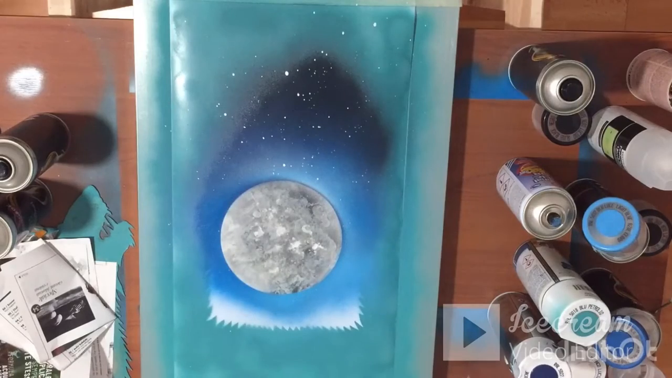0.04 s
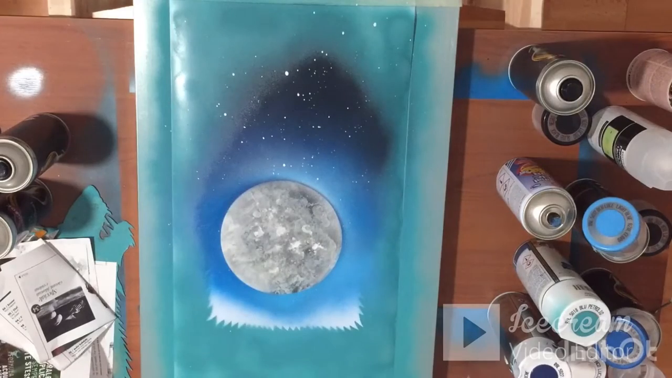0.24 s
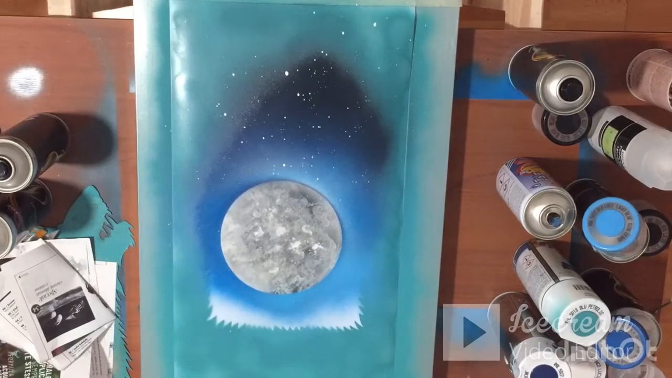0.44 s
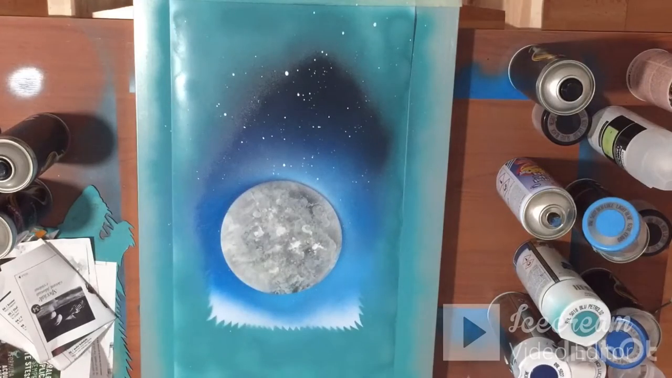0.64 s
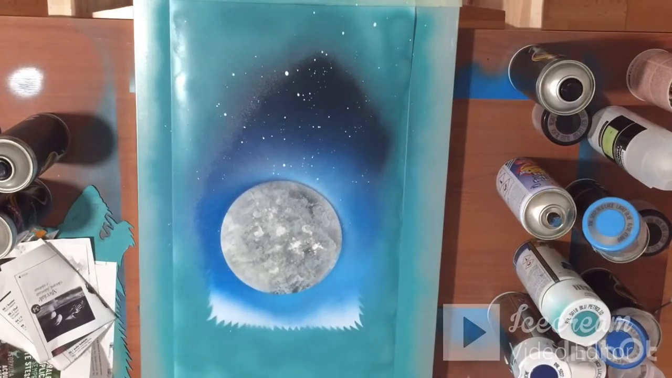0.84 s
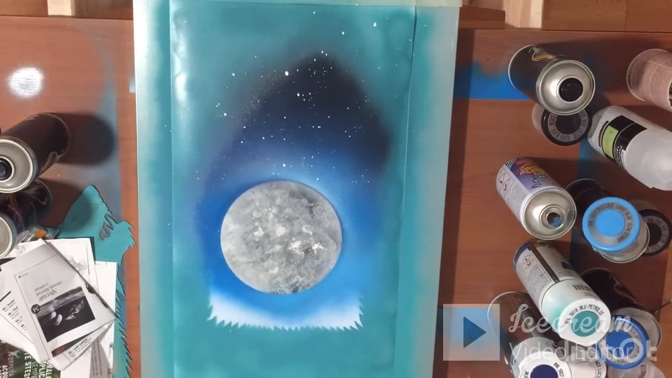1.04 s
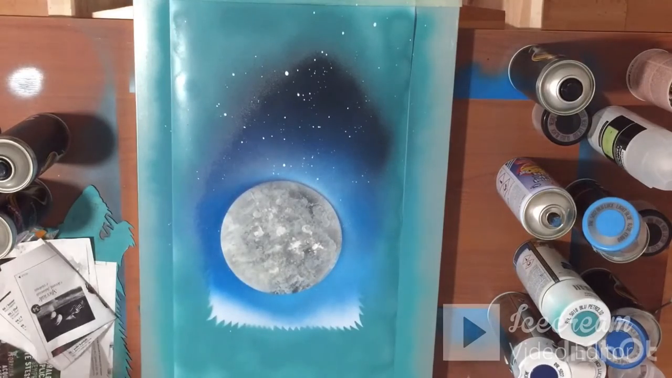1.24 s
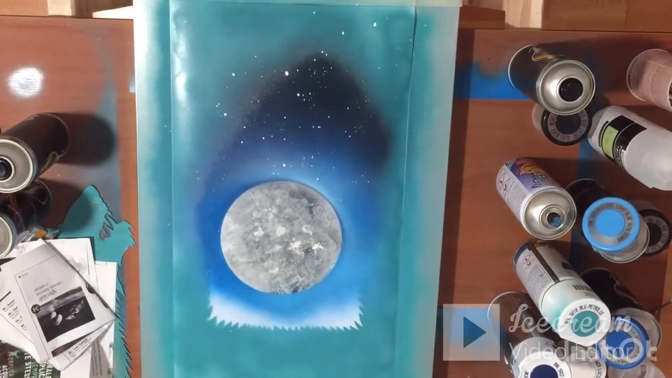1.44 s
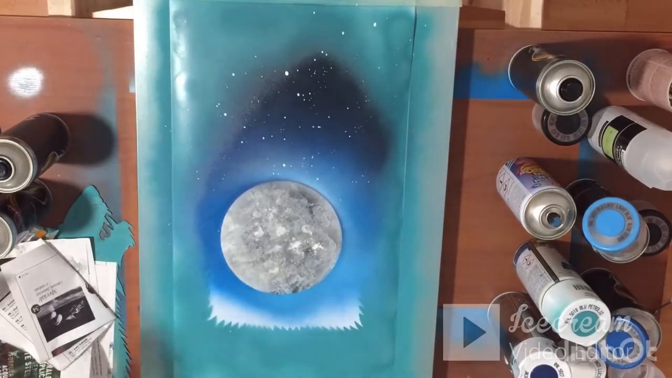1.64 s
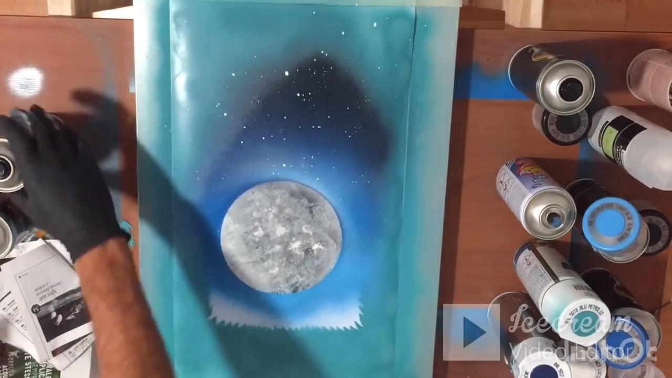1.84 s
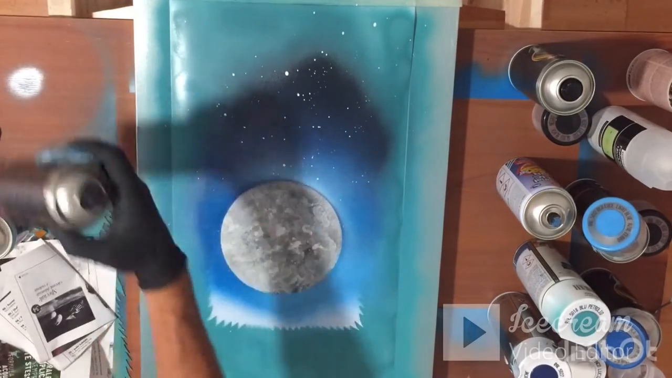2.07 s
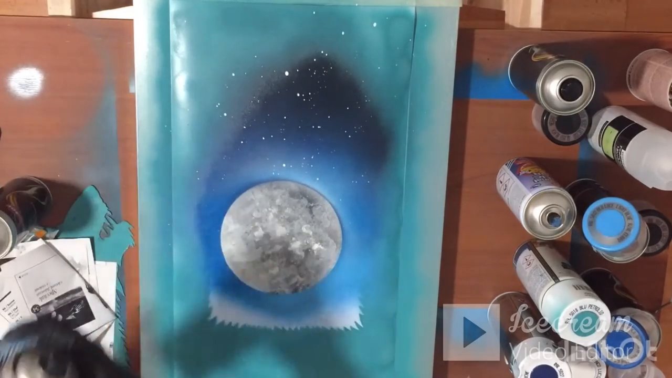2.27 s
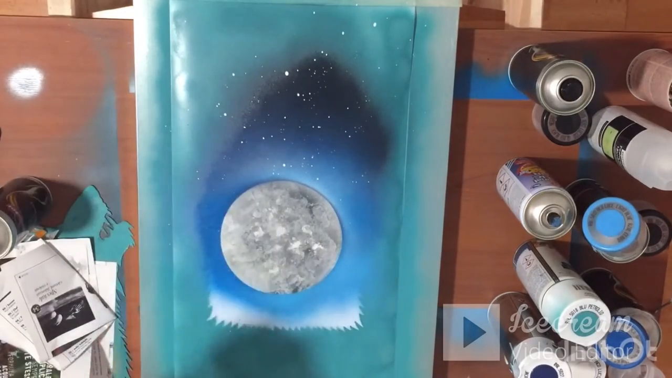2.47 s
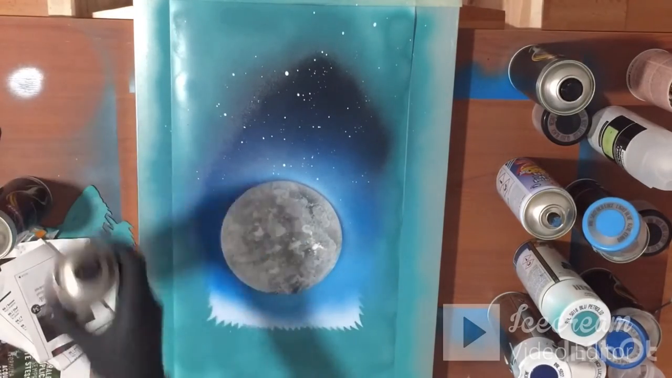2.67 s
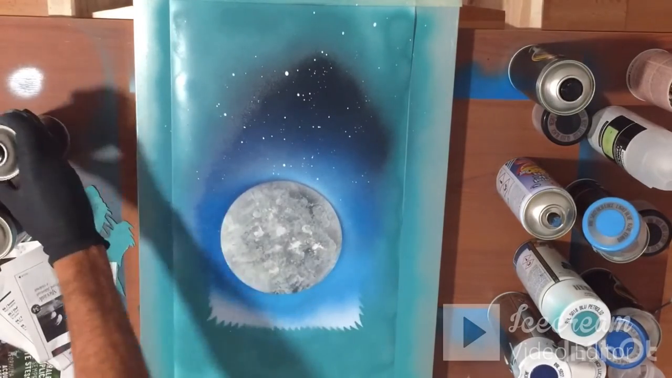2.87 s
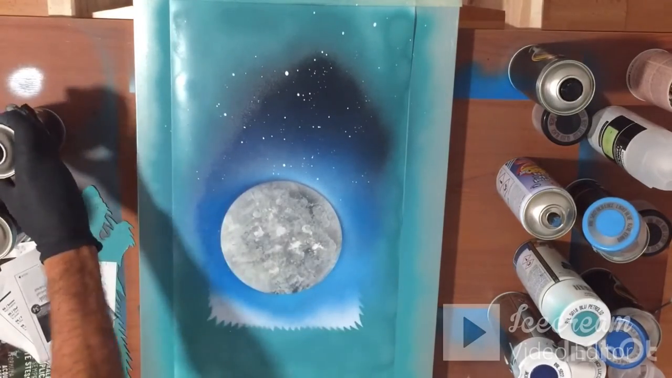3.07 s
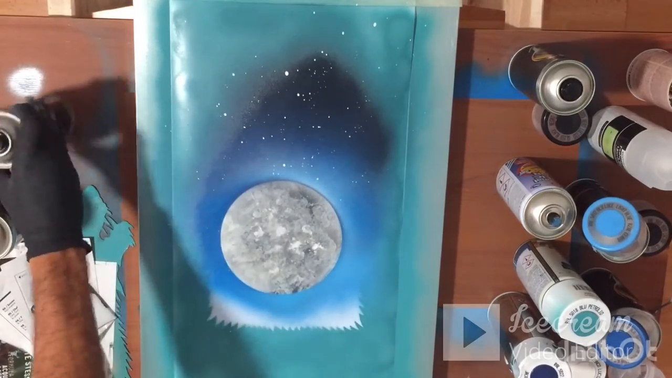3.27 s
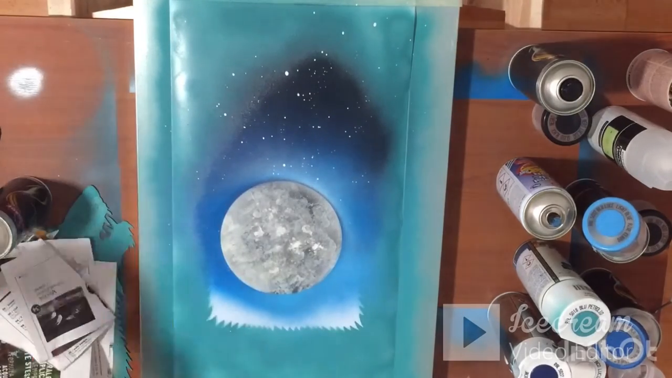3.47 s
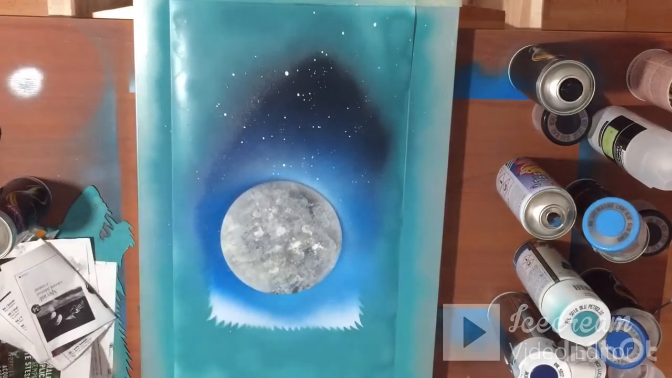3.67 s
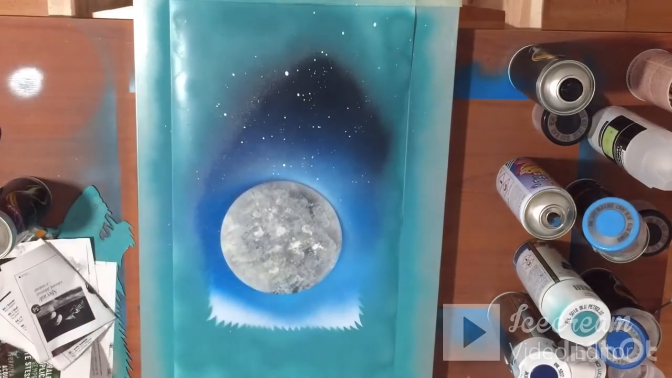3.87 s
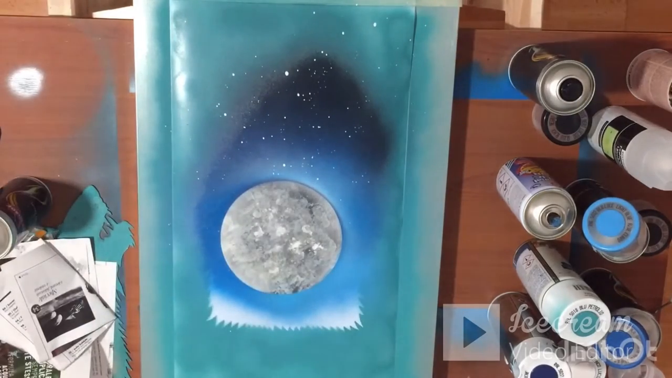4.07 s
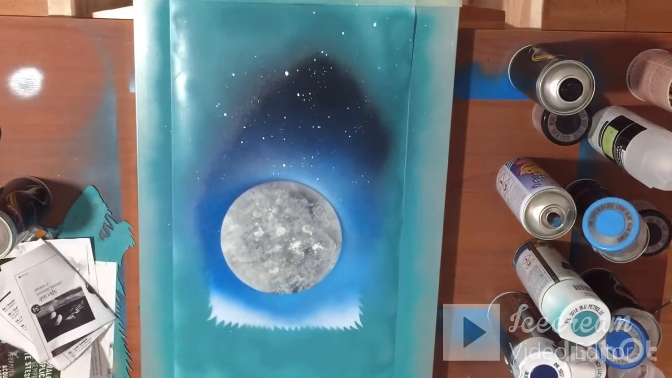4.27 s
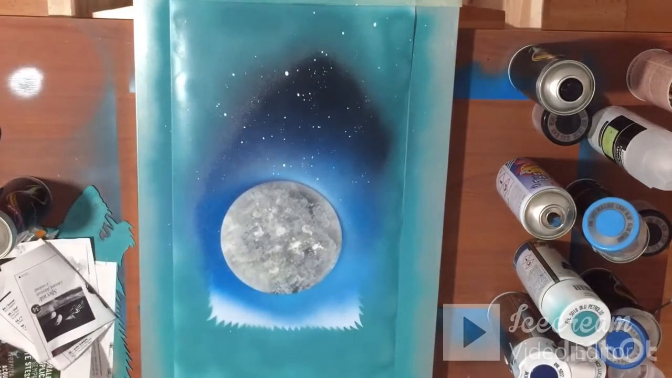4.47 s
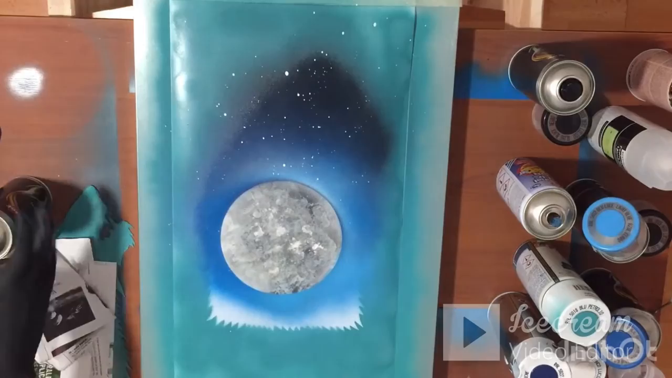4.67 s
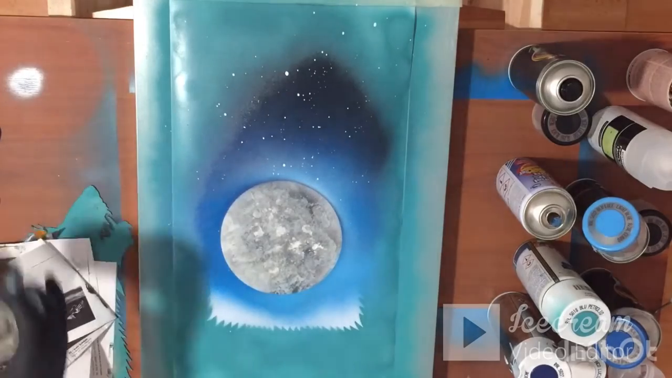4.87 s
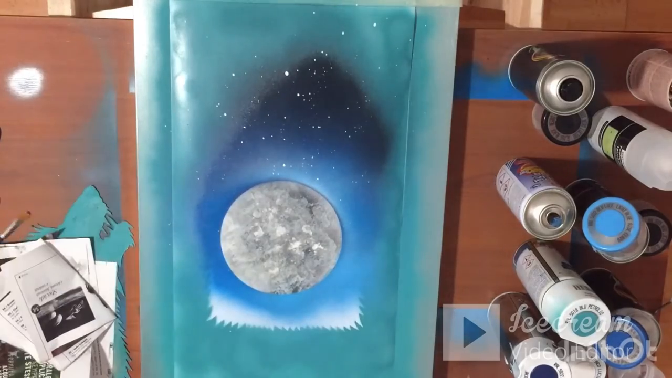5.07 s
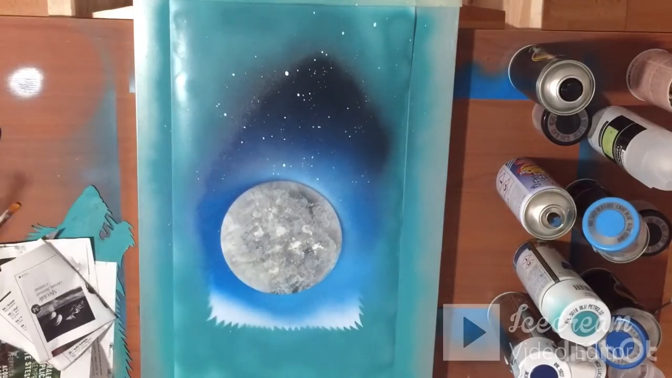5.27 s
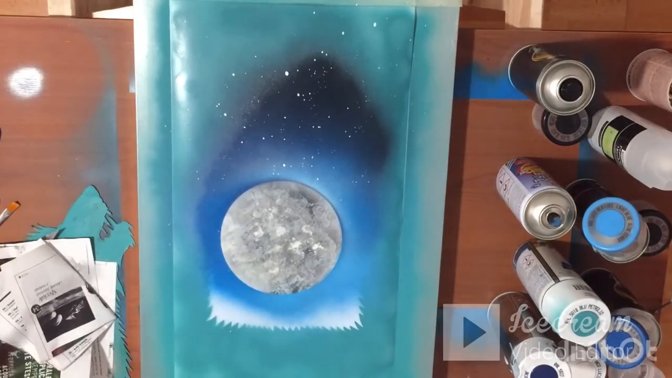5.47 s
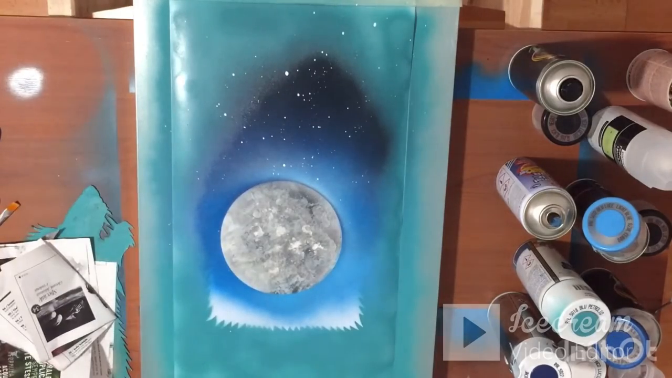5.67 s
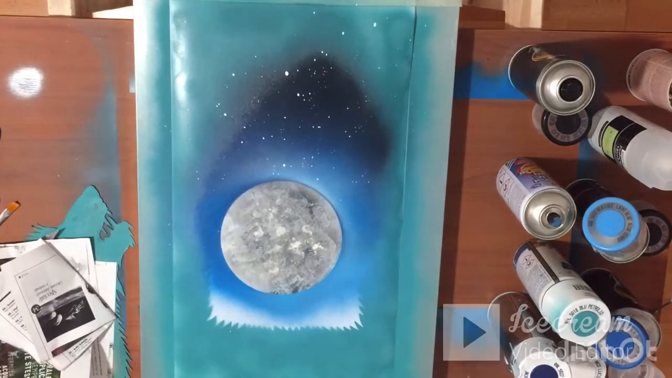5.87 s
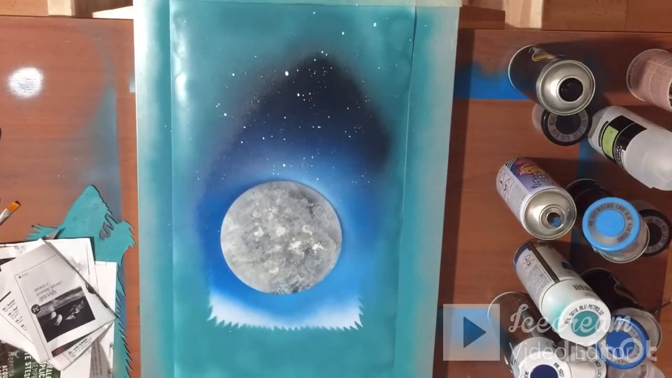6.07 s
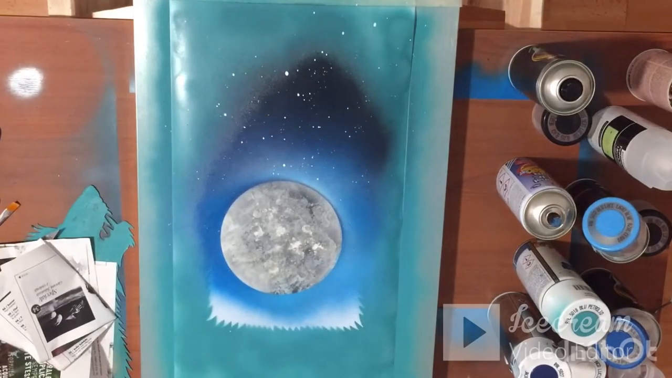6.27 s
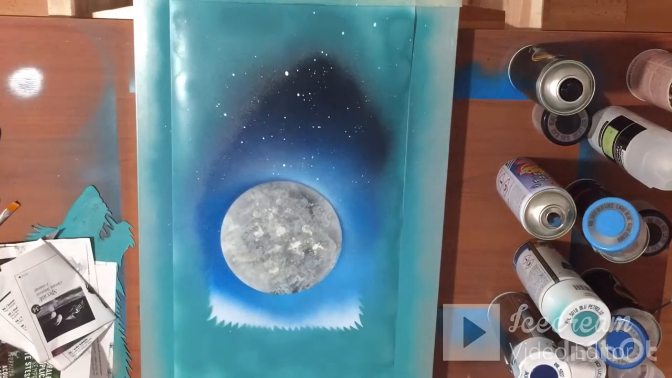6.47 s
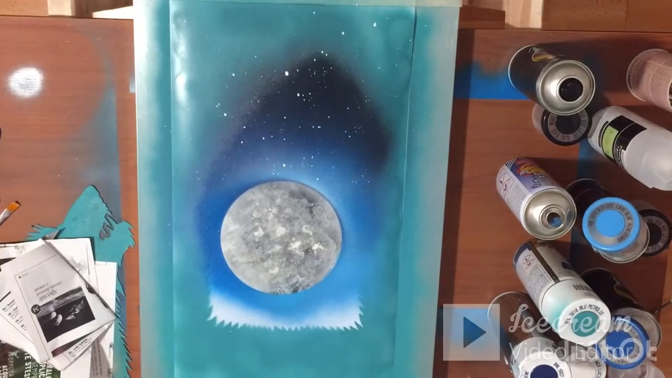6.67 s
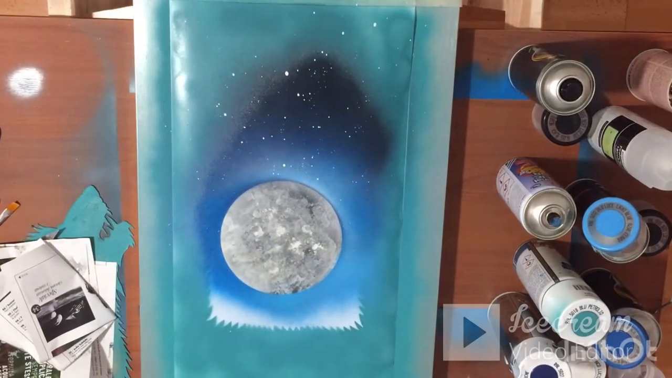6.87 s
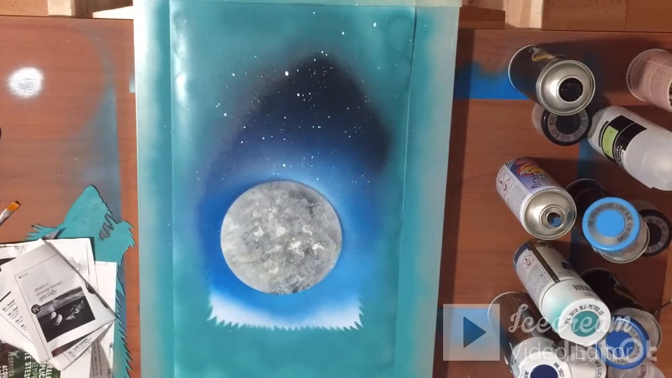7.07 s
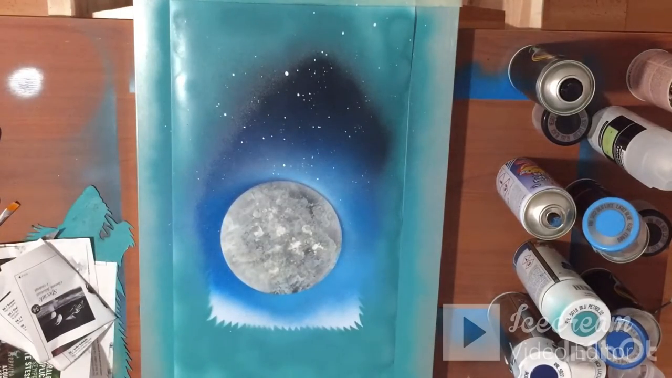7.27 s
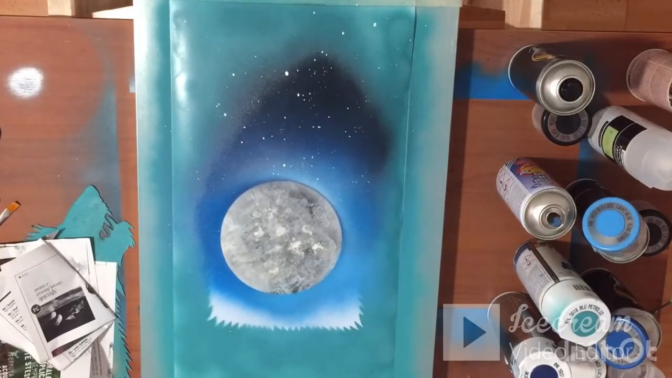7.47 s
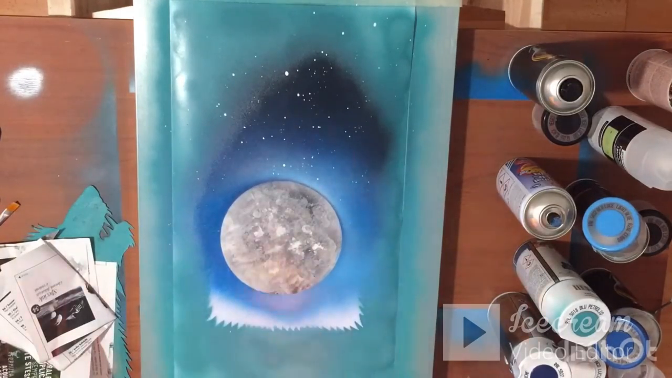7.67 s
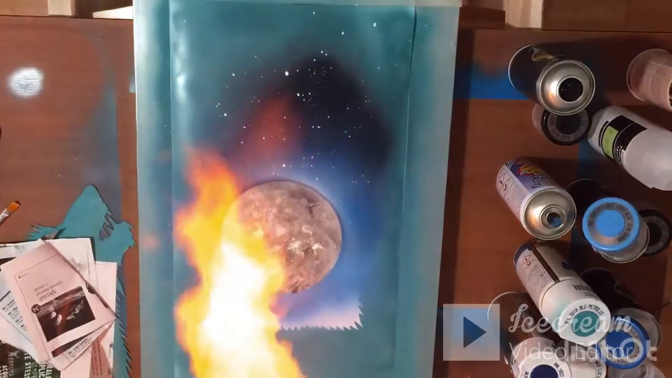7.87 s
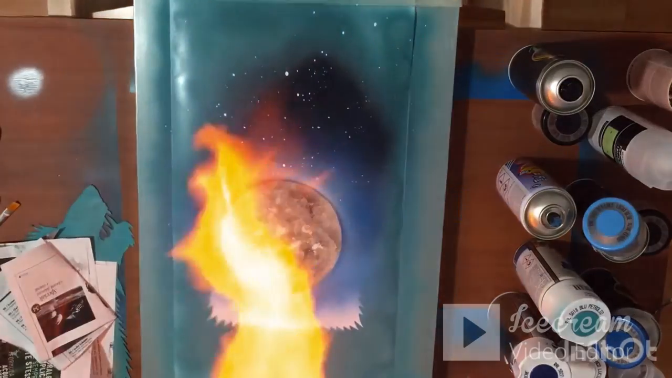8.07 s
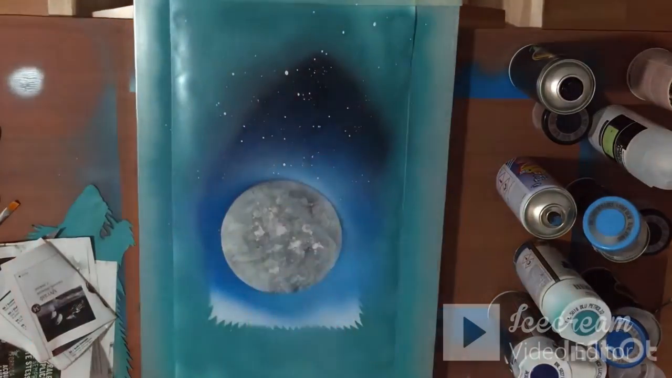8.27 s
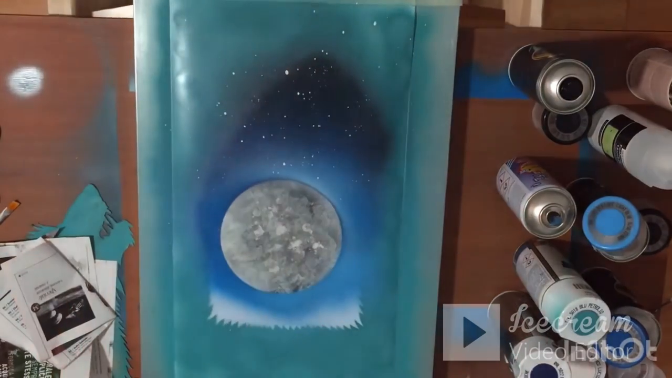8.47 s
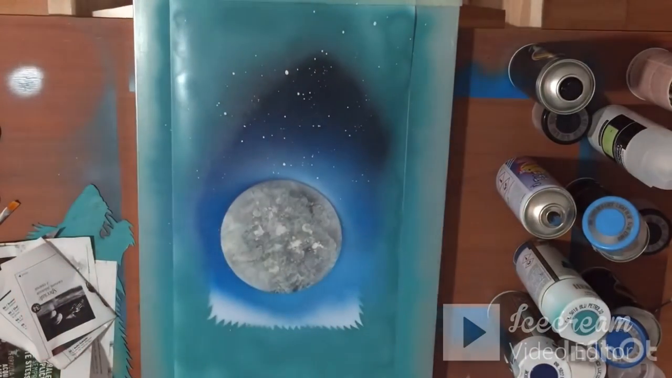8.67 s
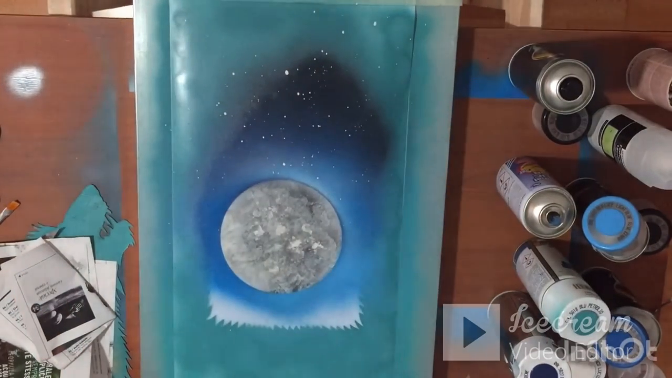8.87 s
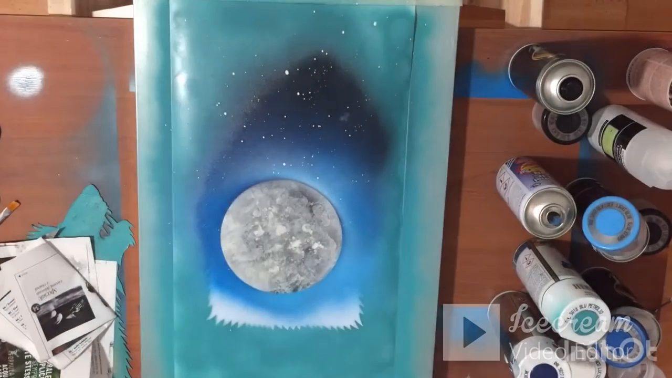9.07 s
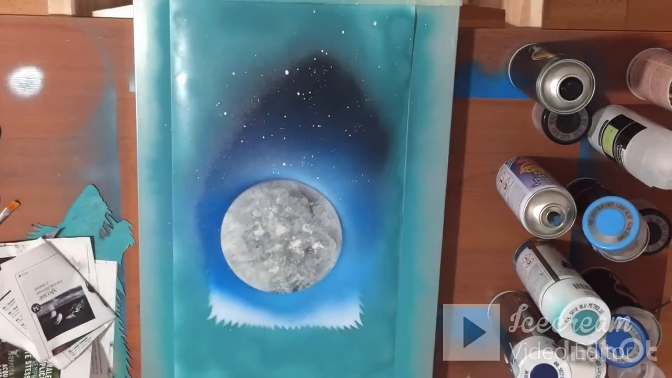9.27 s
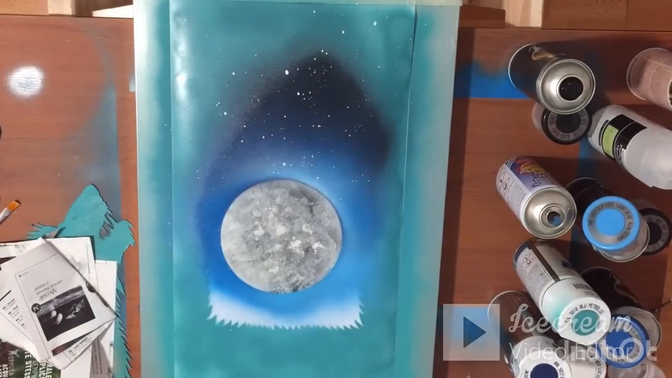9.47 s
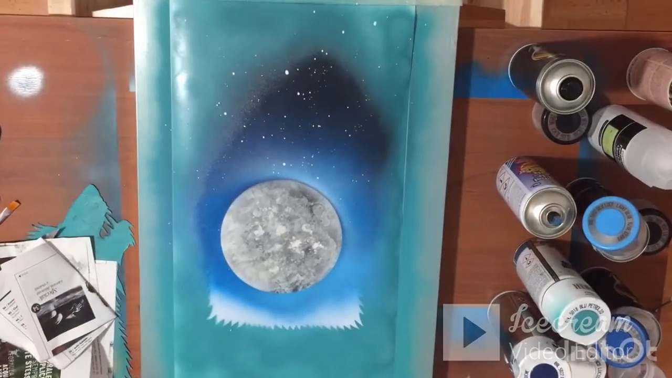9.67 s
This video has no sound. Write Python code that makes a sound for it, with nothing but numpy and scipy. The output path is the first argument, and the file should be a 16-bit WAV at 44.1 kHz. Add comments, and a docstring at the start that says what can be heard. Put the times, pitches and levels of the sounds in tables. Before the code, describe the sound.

Close single-microphone sound from a small room: things are put down on a wooden tabletop with dull, chattering knocks, a glove brushes over cans and paper, and thin metal clinks. Small objects are nudged about, then a paint can rattles rhythmically for over a second. After a pause and two sharp plastic snaps, a spray jet bursts into booming flame, dies quickly, and leaves quiet with low thuds and three lighter clicks.

```python
"""Dull room tone and a glove's strokes come first, at a painter's table in a small room, one microphone.
Things are set down on wood as bursts of micro-impacts, and spray cans clink with dying metal modes.
A can is shaken: its ball clacks on the ends while paint sloshes as many tiny slips. A lighter clicks twice;
the spray, coloured noise, catches fire and roars for under a second. Soft low bumps follow, and the lighter
clicks three more times. Struck and rubbed sounds reach the microphone with decaying reflections."""
import sys
import numpy as np
from scipy import signal
from scipy.fft import rfft, irfft, next_fast_len
from scipy.io import wavfile
from scipy.ndimage import uniform_filter1d

SR = 44100
rng = np.random.default_rng(int(sys.argv[2]) if len(sys.argv) > 2 else 0)


def dump(signal):
    """Clip the signal to [-1, 1] and save it as 16-bit WAV at the path in sys.argv[1]."""
    limited = np.clip(np.atleast_2d(signal).T, -1, 1)
    pcm = np.round(limited * 32767).astype(np.int16)
    wavfile.write(sys.argv[1], SR, pcm)


N = 429534


def amp(db):
    """Amplitude factor of a level in dB."""
    return 10 ** (np.asarray(db) / 20)


def unit_rms(x):
    """Scales to rms 1."""
    return x / np.sqrt(np.mean(x ** 2) + 1e-20)


def unit_energy(x):
    """Scales to a sum of squares of 1."""
    return x / np.sqrt(np.sum(x ** 2) + 1e-20)


def read_curve(points, hz):
    """Reads a curve between its points, along log frequency."""
    f, value = np.transpose(points)
    return np.interp(np.log(hz + 1), np.log(f + 1), value)


def held(on, off, attack_s, fall_db_per_s):
    """Gain over time: rises 60 dB in attack_s to be full at on, holds until off, dies away."""
    t = np.arange(N) / SR
    rise_db = -60 * np.maximum(on - t, 0) / attack_s
    fall_db = -fall_db_per_s * np.maximum(t - off, 0)
    return amp(rise_db + fall_db)


def hump(middle, length):
    """A smooth bell over time, of height 1."""
    return np.exp(-(2 * (np.arange(N) / SR - middle) / length) ** 2)


def add(mix, s, sound):
    """Adds a sound into the mix, starting at s seconds."""
    part = mix[max(round(s * SR), 0):][:len(sound)]
    part += sound[:len(part)]


def coloured_noise(spectrum):
    """Steady noise with the given spectrum, at rms 1."""
    size = next_fast_len(N)
    return shape(rng.standard_normal(N), spectrum, size)


def shape(x, spectrum, size):
    """Gives a long sound a spectrum, at rms 1."""
    gain = amp(read_curve(spectrum, np.fft.rfftfreq(size, 1 / SR)))
    return unit_rms(irfft(rfft(x, size) * gain, size)[:N])


def wobble(hz):
    """Smooth chance of rms 1 that changes hz times a second."""
    return unit_rms(np.interp(np.arange(N) / SR * hz, np.arange(N), rng.standard_normal(N)))


def blow(spectrum, tilt_db, contact, patchy_db=0):
    """A dying burst of micro-impacts through a body's causal colour; energy 1."""
    taps = 4096
    hz, t = np.fft.rfftfreq(taps, 1 / SR), np.arange(2 * taps) / SR
    force = rng.standard_normal(len(t)) * np.exp(-(t / contact) ** 2 / 2)
    # the burst is evened out over frequency, so that the body sets the colour
    force_spectrum = np.sqrt(uniform_filter1d(abs(rfft(force)[::2]) ** 2, size=25))
    # each striking place favours other resonances
    place = unit_rms(uniform_filter1d(rng.standard_normal(len(hz)), size=50))
    # harder contact brightens everything above 1 kHz
    octaves = np.log2(np.maximum(hz, 1000) / 1000)
    gain = amp(read_curve(spectrum, hz) + tilt_db * octaves + patchy_db * place) / force_spectrum
    # minimum phase: the body answers as early as its colour allows
    log_gain = np.log(np.r_[gain, gain[-2:0:-1]])
    body = np.fft.ifft(np.exp(np.conj(signal.hilbert(log_gain)))).real
    return unit_energy(signal.fftconvolve(force, body)[:len(t)])


def ring(modes, detune):
    """Dying modes, started from rest; pitch and strength depend on grip and striking place; energy 1."""
    t = np.arange(SR // 2) / SR
    grip = 1 + detune * rng.uniform(-1.3, 1)
    strengths = rng.choice([-1, 1], len(modes)) * amp(2 * rng.standard_normal(len(modes)))
    total = np.zeros(len(t))
    for strength, (hz, db, t60) in zip(strengths, modes):
        total += strength * amp(db - 60 * t / t60) * np.sin(2 * np.pi * hz * grip * t)
    return unit_energy(total)


# the small room's decay: f/Hz, time to fall 60 dB/s
ROOM_DECAY = [(150, 0.46), (500, 0.31), (1500, 0.38), (4000, 0.33), (8000, 0.28), (16000, 0.21)]


def room_tail():
    """Dense reflections, each band dying at its own speed; energy 1."""
    size = SR // 2
    fade_in = np.clip(np.arange(size) / SR / 0.002 - .5, 0, 1)  # silent for 1 ms, full at 3 ms
    reflections = rng.standard_normal(size) * (rng.random(size) < .15) * fade_in
    hz, t, bands = signal.stft(reflections, SR, nperseg=256)
    decay = amp(-60 * t / read_curve(ROOM_DECAY, hz)[:, None])
    return unit_energy(signal.istft(bands * decay, SR, nperseg=256)[1])


def in_room(x, wet_db):
    """Direct sound to the microphone plus its reflections."""
    response = amp(wet_db) * room_tail()
    response[0] += 1
    return signal.oaconvolve(x, response)


def hit(db, sound, wet_db):
    """A blow in the room; its level is the direct energy spread over 10 ms."""
    return amp(db) * np.sqrt(SR / 100) * in_room(sound, wet_db)


def metal(spectrum, tilt_db, contact, modes, ring_db, detune):
    """A tick, clean or skidding, with ringing sheet metal behind it."""
    sound = amp(ring_db) * ring(modes, detune)
    contact_s = contact * 2 ** rng.uniform(-.5, .5)
    add(sound, 0, blow(spectrum, tilt_db, contact_s, patchy_db=2.5))
    return sound


def friction(envelope, spectrum, per_s, spread_db):
    """Many tiny slips of uneven size under an envelope, heard in the room."""
    sizes = amp(spread_db * np.minimum(rng.exponential(1, N), 2)) * rng.choice([-1, 1], N)
    slips = shape(sizes * (rng.random(N) < per_s / SR), spectrum, next_fast_len(N))
    return in_room(slips * envelope, wet_db=-2)[:N] / 2


# the room tone around its usual level: middle t/s, length/s, level change/dB
SWELLS = [(0, 0.98, 6), (2.533, 0.57, -4.5), (4.903, 2.2, 5)]
# colour of the room tone: f/Hz, relative level per Hz/dB
AIR_COLOUR = [(25, -19), (80, 8), (120, -2.5), (160, 0.5), (326, -2.5), (427, -14.5), (1020, -9),
              (2200, -19), (4030, -32.5), (5570, -38.5), (16000, -47.5)]
AIR_GAIN_DB, RUMBLE_GAIN_DB, RUMBLE_HZ = -48, -51, 130  # upper part, low part, where they divide


def air():
    """Dull room tone that swells and sinks; its rumble follows by half."""
    tone = coloured_noise(AIR_COLOUR)
    rumble = signal.sosfiltfilt(signal.butter(2, RUMBLE_HZ, fs=SR, output="sos"), tone)
    swell = amp(AIR_GAIN_DB + sum(db * hump(s, length) for s, length, db in SWELLS))
    low = amp(RUMBLE_GAIN_DB) * rumble * unit_rms(np.sqrt(swell))
    return low + (tone - rumble) * swell * amp(1.8 * wobble(hz=16))


# strokes of the glove on cans and paper: middle t/s, length/s, relative level/dB
RUBS = [(0.054, 0.12, -53), (0.287, 0.045, -53), (1.16, 0.098, -55.5), (1.52, .11, -42),
        (1.94, 0.39, -51.5), (2.176, .15, -42.5), (2.814, .13, -43.5), (3.746, 0.17, -37),
        (3.915, 0.17, -37.5)]
# colours of the glove and of the paint: f/Hz, relative level per Hz/dB
RUB_COLOUR = [(900, -28.5), (2000, -1), (3000, -6.5), (5300, -5.5), (8400, -9.5), (10500, -15.5),
              (16000, -14.5)]
SLOSH_COLOUR = [(500, -8.5), (1470, 3), (3080, -2.5), (5400, -8.5), (10500, -20.5), (12200, -13),
                (16000, -29)]
# the glove slides at each touch of a can: length in s, relative level for a 0 dB clink, dB per dB of clink
SLIDE_S, SLIDE_DB, SLIDE_SLOPE = 0.12, -35, 0.41
# paint sloshes while the can is shaken, then settles
SLOSH_ON_S, SLOSH_OFF_S, SLOSH_GAIN_DB, SETTLE_DB_PER_S = 5.26, 6.59, -34, 36.5
GRAZES_PER_S, GRAZE_DB = 32, -3.5  # the ball grazes the wall between hits; envelope against the slosh


def handling():
    """The glove's uneven strokes make the can wall sing; paint sloshes and the ball grazes in the shaking."""
    slides = [(s, SLIDE_S, SLIDE_DB + SLIDE_SLOPE * db) for s, db, _ in CLINKS]
    strokes = np.sqrt(sum((amp(db) * hump(s, length)) ** 2 for s, length, db in RUBS + slides))
    grip = unit_rms(amp(7.9 * np.tanh(wobble(hz=69.6))))  # the glove catches and lets go
    rub = friction(strokes * grip, RUB_COLOUR, per_s=5000, spread_db=9.0)
    wall_answer = signal.oaconvolve(rub, ring(WALL_MODES, detune=.008))[:N]
    singing = np.linalg.norm(rub) * unit_energy(wall_answer)  # as strong as the rub
    rub = rub + amp(-14) * singing

    shaking = amp(SLOSH_GAIN_DB) * held(SLOSH_ON_S, SLOSH_OFF_S, 0.19, SETTLE_DB_PER_S)
    surges = unit_rms(amp(7.9 * np.tanh(wobble(hz=40.16))))
    slosh = friction(shaking * surges, SLOSH_COLOUR, per_s=3000, spread_db=8.5)
    loose = shaking * held(SLOSH_ON_S, SLOSH_OFF_S, .1, 50) * amp(GRAZE_DB)
    grazes = friction(loose, BALL_COLOUR, per_s=GRAZES_PER_S, spread_db=2)
    return amp(2.5) * rub + slosh + grazes


# things set down on the table: t/s, level/dB, relative brightness/dB per octave, chatter scale/s,
# first contact before its brightness-matched chatter/dB, boom of the table top against the knock/dB
KNOCKS = [(.795, -27.5, 6, 0.044, 4, 1.5), (0.919, -34, -8.5, 0.024, 3, -3),
          (1.194, -19, -1, .012, -7, -17), (1.317, -16.5, 0, 0.032, -8, -23),
          (1.939, -42, 2, 0.018, -2, -25), (2.969, -17, -3.5, .013, -0.5, -22),
          (4.093, -25, -4, 0.021, -7.5, -0.5), (4.211, -18, 0, 0.028, 3.5, -15.5),
          (4.599, -42, -12, 0.0072, 2, -11), (4.726, -38, -9, 0.011, 2, -9),
          (5.014, -35, 3.5, .008, -3, -14.5)]
# colour of wood: f/Hz, relative level per Hz/dB
WOOD_COLOUR = [(76, -46.5), (180, -15.5), (280, -3.5), (420, -6), (540, 3), (750, -3), (1050, 0.5),
               (1600, -4), (2300, -9), (3700, -14), (9500, -34.5), (16000, -48)]
# ringing of the table top: f/Hz, relative level/dB, time to fall 60 dB/s
TABLE_MODES = [(270, -9, 0.089), (520, 0.5, 0.024)]
ROCK_S = .007  # from the first contact until the rest of the base lands
TABLE_LOW_HZ = 150  # the table top radiates little below this


def table():
    """A dull first contact booms the table top, then the object settles with a brighter chatter."""
    out = np.zeros(N)
    for s, db, tilt_db, chatter, first_db, boom_db in KNOCKS:
        knock = amp(first_db) * blow(WOOD_COLOUR, tilt_db - 3.5, 0.004)
        # longer chatter is also stronger
        add(knock, ROCK_S, chatter / 0.043 * blow(WOOD_COLOUR, tilt_db + 2.2, chatter / 2))
        knock = unit_energy(knock)
        add(knock, 0, amp(boom_db) * ring(TABLE_MODES, detune=.04))
        add(out, s, hit(db, knock, wet_db=2.0))
    return signal.sosfilt(signal.butter(2, TABLE_LOW_HZ, "highpass", fs=SR, output="sos"), out)


# cans touched and bumped: t/s, level/dB, favoured ring f/Hz
CLINKS = [(2.39, -53.5, 4360), (2.659, -42.5, 1970), (3.479, -25, 1600), (3.513, -27.5, 1940),
          (3.632, -29, 1850), (3.662, -28.5, 5550), (4.768, -41.5, 4200), (4.946, -37, 4720),
          (5.164, -39, 1710)]
# colour of the tick on tin: f/Hz, relative level per Hz/dB
TIN_COLOUR = [(600, -44.5), (1200, -10), (1900, -8.5), (3000, -14.5), (7000, -17.5), (10400, -22.5),
              (14000, -26)]
# ringing of the can wall: f/Hz, relative level/dB, time to fall 60 dB/s
WALL_MODES = [(1609, -2.5, 0.15), (1970, -7, .3), (1940, 5.5, 0.12), (2330, -4.5, .25), (3536, -0.5, .25),
              (4205, -1.5, 0.22), (4720, -5.5, .22), (5500, -3, .25), (5700, -6, .2), (7200, -6, 0.31)]
CLINK_TILT_DB, CLINK_RING_DB = 2, -3.5  # brightness per octave; ring against tick


def cans():
    """Light bumps ring the can wall; the striking place favours some modes."""
    out = np.zeros(N)
    for s, db, main_hz in CLINKS:
        modes = []
        for hz, mode_db, t60 in WALL_MODES:
            distance_db = 21 * np.sqrt(abs(np.log2(hz / main_hz)))  # weaker away from the favoured pitch
            modes.append((hz, mode_db - distance_db, t60))
        clink = metal(TIN_COLOUR, CLINK_TILT_DB, 0.0029, modes, CLINK_RING_DB, detune=0.0062)
        add(out, s, hit(db, clink, wet_db=0.0))
    return out


# colour of things nudged over the table: f/Hz, relative level per Hz/dB
RUMMAGE_COLOUR = [(200, -25), (550, -1.5), (1100, -8), (2500, -15), (4200, -10.5), (5200, -31),
                  (16000, -54)]
RUMMAGE_FULL_S, RUMMAGE_OFF_S, RUMMAGE_GAIN_DB = 4.4, 5.22, -46.5


def rummaging():
    """Things are nudged over the wood in small jerks."""
    jerks = unit_rms(amp(12 * np.tanh(wobble(hz=36.7))))
    envelope = amp(RUMMAGE_GAIN_DB) * held(RUMMAGE_FULL_S, RUMMAGE_OFF_S, 1.0, 80)
    return friction(envelope * jerks, RUMMAGE_COLOUR, per_s=1500, spread_db=3.5)


# colour of the ball's hits: f/Hz, relative level per Hz/dB
BALL_COLOUR = [(400, -34), (1400, -10.5), (2600, -5.5), (4500, -5.5), (5700, 3.5), (7500, -5), (9200, -7.5),
               (10400, -14.5), (12500, -9), (16000, -21)]
# ringing of the can's domed base: f/Hz, relative level/dB, time to fall 60 dB/s
DOME_MODES = [(2527, 1, 0.035), (2724, -1.2, 0.047)]


def clack(db, tilt_db, ring_db):
    """One hit of the ball: a tick of level db, with the base ringing at ring_db."""
    sound = metal(BALL_COLOUR, tilt_db, 0.002, DOME_MODES, ring_db - db, detune=0.0057)
    return hit(db, sound, wet_db=-2.0)


# throws of the ball against one end: t/s, level/dB, rebound delay/s (0 for none), brightness/dB per octave
SHAKES = [(5.19, -18, .005, -2), (5.295, -14, .004, 5.5), (5.424, -16, .015, 2.5), (5.556, -15.5, 0.013, 3),
          (5.696, -19, 0.0017, 4), (5.821, -18, .022, 4), (5.96, -20, 0, -1), (6.108, -17, 0, 1.5),
          (6.259, -17, 0, 6), (6.398, -21, 0, 3.5)]
# softer returns of the ball between throws: t/s, level/dB
FALL_BACKS = [(5.354, -23), (5.509, -20), (5.632, -22), (5.785, -25), (5.906, -25.5), (6.044, -24),
              (6.172, -20.5), (6.336, -25), (6.465, -23.5), (6.635, -29), (6.814, -36)]
# the ball lands square on the base: t/s, tick level/dB, ring level/dB
SQUARE_HITS = [(5.484, -22.5, -32), (5.946, -39, -22), (6.382, -24, -19.5)]
REBOUND_DB = -1.5  # against the first hit of the shake
FALL_BACK_TILT_DB = -3.5  # the return is always dull (dB per octave)
DOME_DB = -41.5  # faint ring of the base at throws, rebounds and returns


def ball():
    """Shakes throw the ball to one end and it falls back; paint damps the wall, square hits ring the base."""
    out = np.zeros(N)
    for s, db, rebound_s, tilt_db in SHAKES:
        add(out, s, clack(db, tilt_db, DOME_DB))
        if rebound_s:
            add(out, s + rebound_s, clack(db + REBOUND_DB, tilt_db, DOME_DB))
    for s, db in FALL_BACKS:
        add(out, s, clack(db, FALL_BACK_TILT_DB, DOME_DB))
    for s, db, ring_db in SQUARE_HITS:
        add(out, s, clack(db, FALL_BACK_TILT_DB, ring_db))
    return out


# presses of the lighter: t/s, direct level/dB
PRESSES = [(6.937, -19.5), (7.167, -18.5), (8.656, -32.5), (8.962, -19.5), (9.301, -22.5)]
# the trigger is let go: t/s
RELEASES = [7.083, 8.863, 9.175, 9.548]
# colour of the snap in its plastic shell: f/Hz, relative level per Hz/dB
SNAP_COLOUR = [(500, -52), (1200, -23), (1750, -0.5), (2400, -7.5), (4300, -8), (5100, -13.5),
               (9400, -14.5), (10400, -20), (15000, -20.5)]
# ringing of the metal wind guard: f/Hz, relative level/dB, time to fall 60 dB/s
GUARD_MODES = [(2700, -2, .12), (4146, 0, .2), (4480, -1, .2)]
GUARD_DB, SPRING_DB = -42, -43  # the guard's ring; the trigger's return
SNAP_ROOM_DB = -23.5  # the hand may shield a snap, but its echo stays the same


def lighter():
    """The spring hammer snaps in a plastic shell and rings the wind guard; the trigger ticks when let go."""
    out = np.zeros(N)
    for s, db in PRESSES:
        snap = blow(SNAP_COLOUR, tilt_db=0.74, contact=0.002, patchy_db=1)
        add(out, s, hit(db, snap, SNAP_ROOM_DB - db))
        add(out, s, hit(GUARD_DB, ring(GUARD_MODES, detune=0.0199), wet_db=0.5))
    for s in RELEASES:
        add(out, s, hit(SPRING_DB, blow(SNAP_COLOUR, tilt_db=0.8, contact=0.0022), wet_db=-3.5))
    return out


# surges of the flame, each starting with a pop: t/s, time until it dies/s, roar level/dB, pop level/dB
BURNS = [(7.65, 0.02, -14, -11), (7.729, .48, -20, -17.5), (8.165, 0.076, -24, -18),
         (8.393, .035, -22, -20.5)]
# colours of the flame, the jet and the billowing cloud: f/Hz, relative level per Hz/dB
ROAR_COLOUR = [(18, -57), (30, -30), (151, 0.5), (232, -10), (322, -9), (496, -23), (660, -20), (794, -24),
               (2250, -33.5), (4000, -45), (5200, -54), (8800, -120)]
JET_COLOUR = [(1000, 6.5), (2500, -3), (6000, 5), (15500, 2.5)]
BILLOW_COLOUR = [(20, -7), (60, -1), (105, -2), (200, -34), (800, -75)]
CATCH_S, DIE_DB_PER_S = 0.013, 176  # from pop to full roar; how fast a surge dies
# the spray valve opens, loses pressure, closes
JET_ON_S, JET_OFF_S, JET_DB, JET_SAG_DB_PER_S, JET_FALL_DB_PER_S = 7.645, 8.46, -37, 14.5, 380
# the hot cloud grows to full, holds, falls
BILLOW_FULL_S, BILLOW_OFF_S, BILLOW_DB = 8.28, 8.52, -27
BILLOW_GROW_DB_PER_S, BILLOW_FALL_DB_PER_S = 51, 220
DRAUGHT_DB = -57.5  # faint draught under the cloud, which stays after it


def flame():
    """The jet hisses with sagging pressure while the burning cloud roars, pops and billows."""
    t = np.arange(N) / SR
    power = np.zeros(N)
    for s, length, db, _ in BURNS:
        power += (amp(db) * held(s + CATCH_S, s + length, 0.059, DIE_DB_PER_S)) ** 2
    flicker = unit_rms(amp(2.2 * wobble(hz=55)))
    roar = coloured_noise(ROAR_COLOUR) * flicker * np.sqrt(power)
    for s, _, _, pop_db in BURNS:
        add(roar, s, hit(pop_db, blow(ROAR_COLOUR, tilt_db=1.5, contact=.014), wet_db=-6.0))

    sag = amp(JET_DB - JET_SAG_DB_PER_S * (t - JET_ON_S))
    jet = coloured_noise(JET_COLOUR) * sag * held(JET_ON_S, JET_OFF_S, 0.049, JET_FALL_DB_PER_S)

    growth = amp(BILLOW_DB - BILLOW_GROW_DB_PER_S * np.maximum(BILLOW_FULL_S - t, 0))
    cloud = growth * held(JET_ON_S, BILLOW_OFF_S, .04, BILLOW_FALL_DB_PER_S)
    draught = amp(DRAUGHT_DB) * (t > JET_ON_S)
    billow = coloured_noise(BILLOW_COLOUR) * (cloud + draught)
    return roar + jet + billow


# soft low bumps: t/s, level of the envelope's peak/dB, f/Hz
BUMPS = [(8.619, -29, 108), (8.74, -30.5, 102), (9.234, -33, 78), (9.406, -33.5, 78)]


def bumps():
    """A few cycles of low pressure each."""
    out, t = np.zeros(N), np.arange(SR // 5) / SR
    swell = t / 0.0054  # the envelope peaks after 5.4 ms
    for s, db, hz in BUMPS:
        add(out, s, amp(db) * swell * np.exp(1 - swell) * np.sin(2 * np.pi * hz * t))
    return out


def scene():
    """All sources around the table, summed to one channel."""
    around = air() + handling() + table() + cans() + rummaging()
    return (around + ball() + lighter() + flame() + bumps())[None]


def record(dry):
    """Full-scale limit at the microphone, then the 16 kHz band limit."""
    band = signal.firwin(301, 16000, window=("kaiser", 8), fs=SR)[None]
    return signal.oaconvolve(np.clip(dry, -1, 1), band, "same")


dry = scene()
out = record(dry)
dump(out)
```